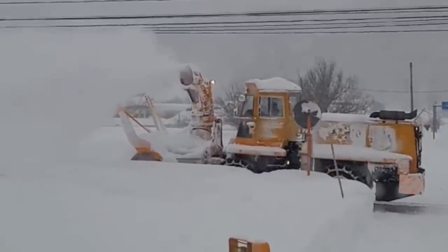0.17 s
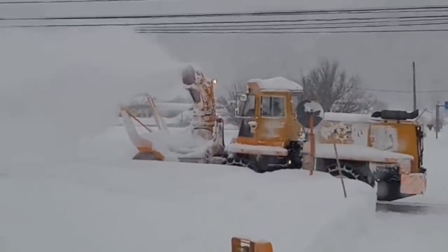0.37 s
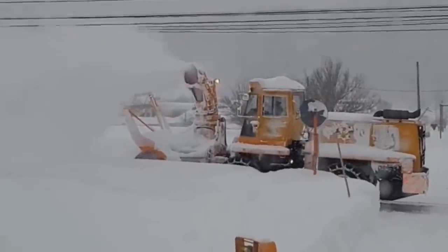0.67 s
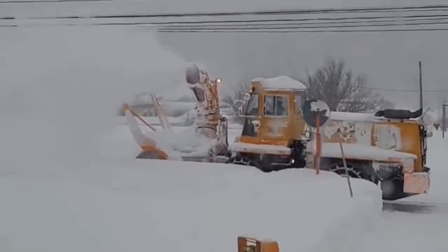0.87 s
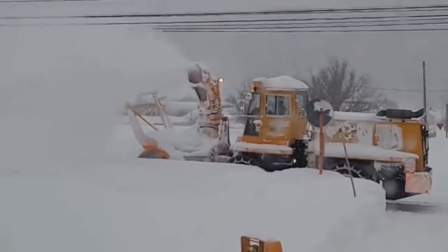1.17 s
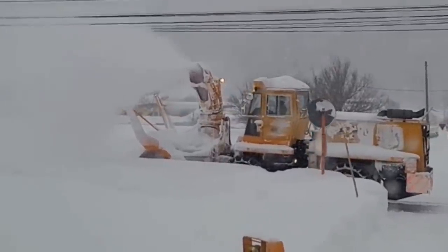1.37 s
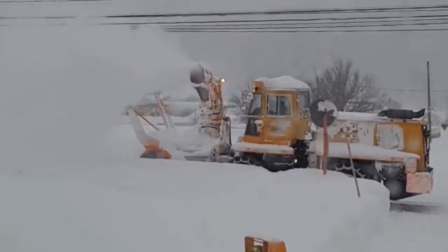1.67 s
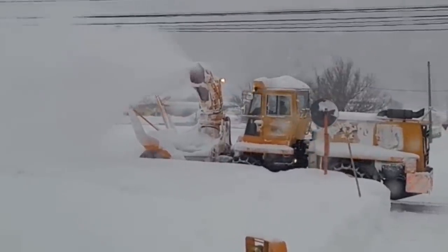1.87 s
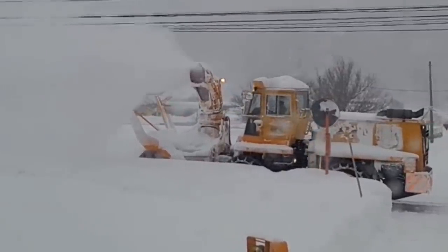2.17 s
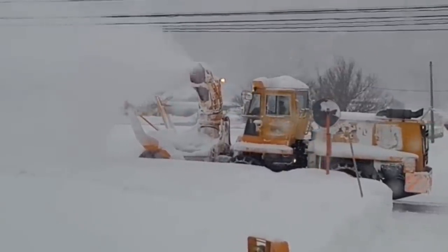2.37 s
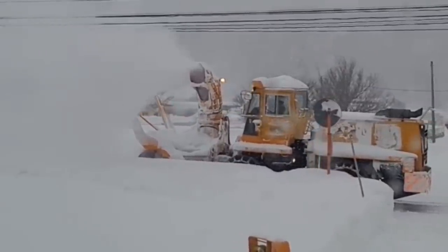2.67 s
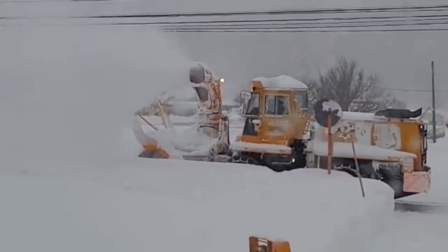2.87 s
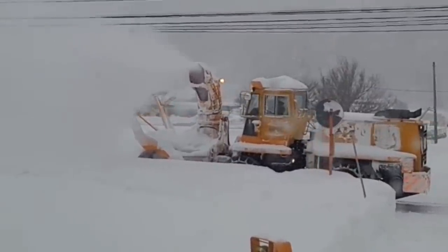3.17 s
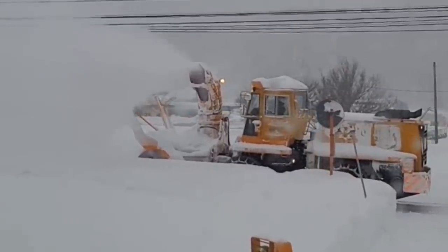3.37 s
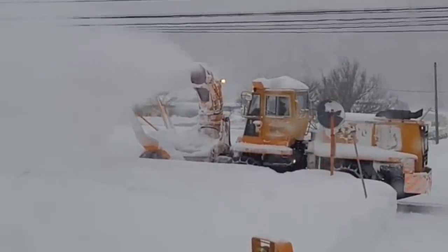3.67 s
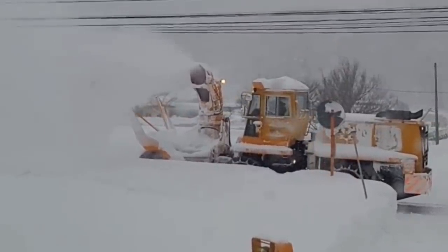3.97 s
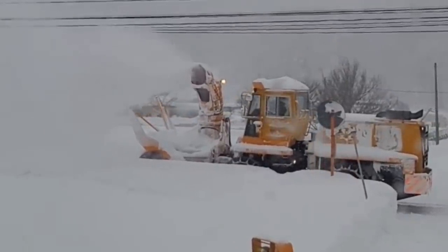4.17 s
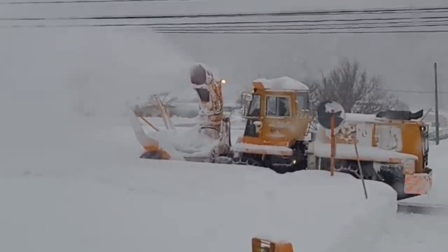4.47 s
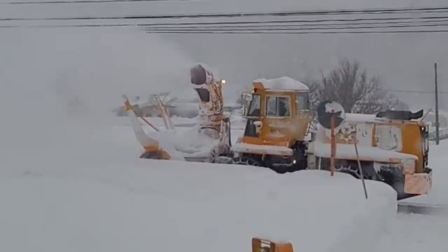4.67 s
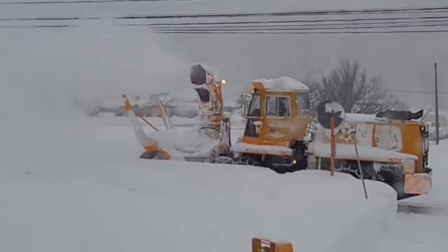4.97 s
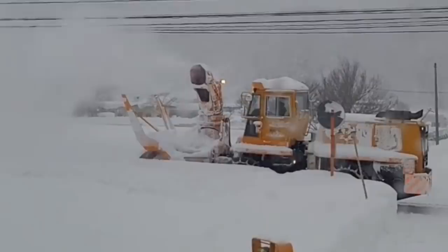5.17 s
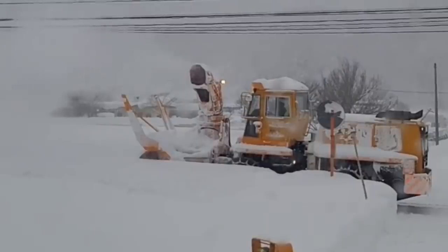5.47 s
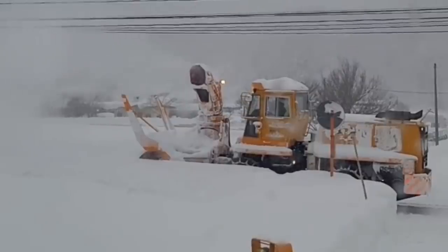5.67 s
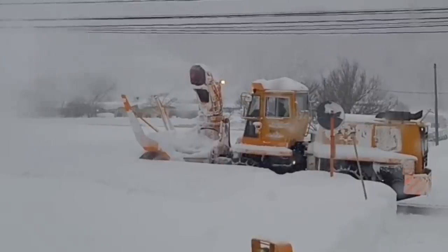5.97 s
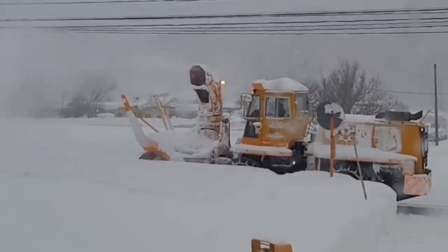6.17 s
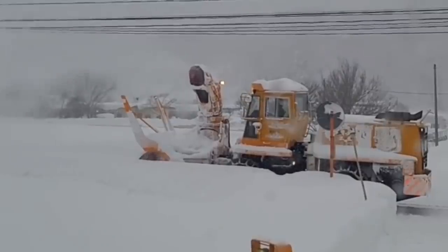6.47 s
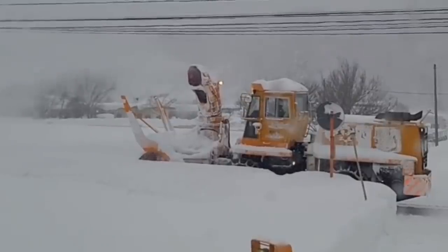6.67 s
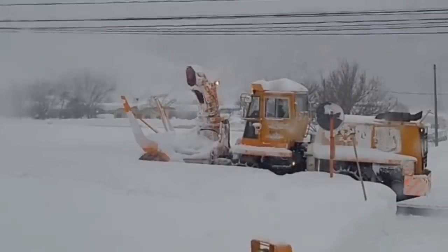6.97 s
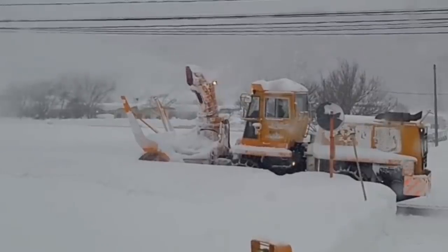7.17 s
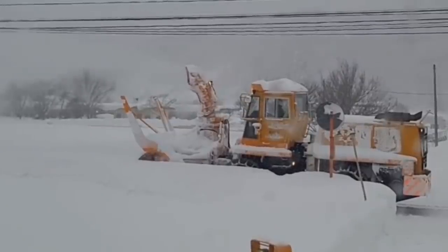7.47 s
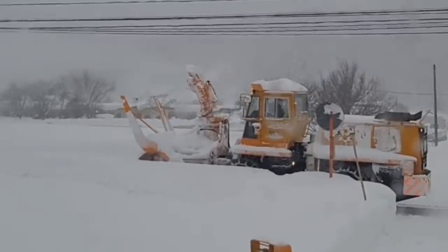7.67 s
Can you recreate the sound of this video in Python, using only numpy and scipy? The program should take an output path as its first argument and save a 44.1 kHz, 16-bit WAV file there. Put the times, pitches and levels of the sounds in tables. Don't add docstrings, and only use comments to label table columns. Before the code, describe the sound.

Inside an idling car, a heavy snow-clearing machine outside drones low and steady while the indicator relay ticks and tocks evenly on the dashboard.

```python
import sys
import numpy as np
from scipy import signal
from scipy.fft import rfft, irfft, next_fast_len
from scipy.io import wavfile
from scipy.ndimage import uniform_filter1d, map_coordinates

SR = 44100
rng = np.random.default_rng(int(sys.argv[2]) if len(sys.argv) > 2 else 0)


def put_to_file(sound):
    columns = np.atleast_2d(sound).T
    safe = np.clip(columns, -1, 1)
    whole_steps = np.round(safe * 32767)
    wavfile.write(sys.argv[1], SR, whole_steps.astype(np.int16))


def convert_level_to_amplitude(level_db):
    exponent = np.asarray(level_db, float) / 20
    return 10 ** exponent


N = 345303


def unit(x):
    return x / np.sqrt(np.mean(x ** 2) + 1e-20)


def along(points, hz):
    f, *cols = np.transpose(points)
    return [np.interp(np.log(hz + 1), np.log(f + 1), c) for c in cols]


def wobble(rate_hz):
    knots = rng.standard_normal(int(N * rate_hz / SR) + 4)
    return map_coordinates(knots, [np.arange(N) * rate_hz / SR])


def tone(radians, db, pan_db, lead_rad):
    left = convert_level_to_amplitude(pan_db / 2) * np.exp(.5j * lead_rad)
    right = convert_level_to_amplitude(-pan_db / 2) * np.exp(-.5j * lead_rad)
    ports = np.array([left, right])
    wave = np.sqrt(2) * convert_level_to_amplitude(db) * np.exp(1j * radians) / abs(ports.mean())
    return np.real(ports[:, None] * wave)


def rush(spectrum, gate, patchy_db):
    # frequency in Hz, likeness of the ports 0-1, left lead in radians, left-right in dB.
    port_points = [(30, .9, .2, -2), (55, .75, 0, -1), (140, .98, 0, -.5), (165, .9, .1, 2),
                   (185, .55, -1.1, -4), (215, .6, -.3, -8.5), (270, .93, -.3, -2.5), (350, .92, -.4, .4),
                   (410, .45, -1.6, -.5), (480, .6, -1, -6), (700, .3, -2, -3.5), (1030, .5, -2.9, -3),
                   (1500, .3, -3, -6.5), (2300, .15, -4, 1), (4000, .15, -6, -3), (5400, .3, -7, .5),
                   (7000, .1, -9, -5), (8200, .15, -9, 1), (12000, .2, -9, -2)]
    z = signal.stft(rng.standard_normal((2, N)) * gate, nperseg=512)[2]
    field = uniform_filter1d(rng.standard_normal(z.shape[1:]), 6, 0)
    field = uniform_filter1d(field, 14, 1)
    pair = signal.istft(z * convert_level_to_amplitude(patchy_db * unit(field)), nperseg=512)[1][:, :N]

    m = next_fast_len(N + 8192)
    hz = np.fft.rfftfreq(m, 1 / SR)
    in_band = (hz >= spectrum[0][0]) * (hz < spectrum[-1][0])
    modes_db = 1.5 * np.interp(hz, 27 * np.arange(900), rng.standard_normal(900)) * (hz > 500) * (hz < 5600)
    a, b = rfft(pair, m) * convert_level_to_amplitude(along(spectrum, hz)[0]) * in_band * convert_level_to_amplitude(modes_db)

    alike, lead_rad, pan_db = along(port_points, hz)
    mix_rad = np.arccos(np.clip(alike, 0, 1)) / 2
    common, differing = np.cos(mix_rad) * a, np.sin(mix_rad) * b
    left = (common + differing) * convert_level_to_amplitude(pan_db / 2) * np.exp(.5j * lead_rad)
    right = (common - differing) * convert_level_to_amplitude(-pan_db / 2) * np.exp(-.5j * lead_rad)
    return unit(irfft(np.array([left, right]), m)[:, :N])


def turns():
    # time in seconds, crank speed in Hz, car shake in Hz.
    speeds = [
        (0, 13.752, 35.565),
        (1, 13.754, 35.565),
        (2, 13.761, 35.565),
        (4.4, 13.761, 35.705),
        (5.9, 13.761, 35.7),
        (6.4, 13.748, 35.69),
        (7.83, 13.752, 35.62),
    ]
    start_turns = (-.0573, -.025, -.455)
    s, *cols = np.transpose(speeds)
    crank_hz, shake_hz = [np.interp(np.arange(N) / SR, s, c) for c in cols]
    hum_hz = 2.9198 * shake_hz
    return [np.cumsum(f) / SR + start for f, start in zip((crank_hz, shake_hz, hum_hz), start_turns)]


def engine_lines(crank):
    # order, level in dB rms, left-right in dB,
    # left lead in radians.
    order_lines = [(2.0, -58, -3, 0.4), (2.5, -53, -3, 0.4), (3.0, -29, -2, 0.3), (4.5, -57, -1, 0.4),
                   (6.0, -46, -1, 0.3), (7.0, -50, 0, -0.1), (8.5, -58, -2, 0.2), (9.0, -48, -3, 0.2),
                   (11.0, -49, 0, 0.0), (12.0, -44, -3, 1.1), (13.0, -64, -1, -0.5), (24.0, -47, -1, -0.3),
                   (29.0, -69, -5, -2.5), (30.0, -68, -4, -0.9), (32.0, -63, 2, -1.0),
                   (33.0, -64, -9, -0.6), (34.5, -67, -2, -1.1), (36.0, -59, -6, -1.3),
                   (44.0, -73, 0, -0.3), (46.5, -71, -2, -0.1), (48.0, -58, -1, 0.5), (60.0, -68, -1, -0.9),
                   (78.0, -79, -5, -2.7), (84.0, -64, -9, -0.7), (87.0, -66, -10, 2.6),
                   (96.0, -59, -9, -0.6),
                   (99, -73, 1, -1.8), (105, -74, -2, -.5), (108, -69, -11, 1.4), (117, -72, -5, 1.1),
                 (120, -68, -15, -1.4), (141, -74, -14, -2.7), (144, -75, -1, -1.5), (156, -82, -4, 0)]
    twist_rad = .008 * wobble(3) + .003 * wobble(14)
    out = 0
    for order, db, pan_db, lead_rad in order_lines:
        offset = rng.uniform(0, 2 * np.pi) * (order != 3)
        sway_db = 0.12 * np.log(order) * wobble(2.575)
        radians = order * (2 * np.pi * crank + twist_rad) + offset
        out = out + tone(radians, db + 0.035 * order + sway_db, pan_db, lead_rad)
    return out


def engine_noise(crank):
    # frequency in Hz, density in dB per Hz.
    boom_spectrum = [(18, -83), (37, -70), (47, -74.5), (66, -78.5), (94, -67), (112, -79.5), (147, -64.5),
                     (158, -63.5), (167, -66), (175, -81), (194, -81.5), (207, -75), (249, -72), (283, -78),
                     (339, -73.5), (420, -83.5)]
    body_spectrum = [(420, -84), (502, -84.5), (540, -89.5), (616, -91.5), (660, -86.5), (698, -90.5),
                     (834, -87.5), (1088, -92.5), (1233, -85.5), (1392, -94), (1603, -86.5), (1744, -92.5),
                     (1969, -95), (2100, -102.1)]
    rattle_spectrum = [(2100, -101), (2300, -99.5), (2800, -100), (2950, -105), (3220, -100), (3700, -105),
                       (4150, -101), (4300, -109), (4500, -114), (4670, -110), (4900, -113), (5150, -109),
                       (5950, -120), (7120, -119), (9000, -132), (11340, -130), (13200, -136)]
    panel_spectrum = [(320, -18), (327, 4), (334, 0), (341, -9)]
    cylinders_db = [-1.5, 0, -3, -4, -9.5, -8]
    load_db = 0.23 * wobble(0.91)
    pump = 1 + 0.11 * np.cos(2 * np.pi * 12 * crank) + 0.022 * np.cos(2 * np.pi * 24 * crank)
    firing = 3 * crank
    strength_db = np.array(cylinders_db)[np.floor(firing).astype(int) % 6]
    knock = convert_level_to_amplitude(strength_db) * np.exp(-2.5 * (firing % 1))

    boom_db = -36.5 + 0.2 * wobble(2.7) + 0.69 * wobble(6.6)
    boom = convert_level_to_amplitude(boom_db) * rush(boom_spectrum, 1, patchy_db=1.0)
    body = convert_level_to_amplitude(-44.5 + load_db) * rush(body_spectrum, pump * (1 + 0.2 * knock), patchy_db=1.35)
    rattle_db = -56.5 + load_db + 0.5 * wobble(12)
    rattle = convert_level_to_amplitude(rattle_db) * rush(rattle_spectrum, 1 + 0.098 * knock, patchy_db=1.0)
    panel = convert_level_to_amplitude(-54 + load_db) * rush(panel_spectrum, 1, patchy_db=-0.9)
    return boom + body + rattle + panel


def car(shake, hum):
    # left-right in dB, left lead in radians.
    hum_ports = (-3.8, .33)
    shaking = tone(2 * np.pi * shake, -41 + 0.61 * wobble(1.9), -2.2, .3)
    humming = tone(2 * np.pi * hum, -38 + 0.35 * wobble(1.9), *hum_ports)
    return shaking + humming


def whines():
    # frequency in Hz, width in Hz, level in dB rms, left-right in dB, left lead in radians.
    whine_lines = [(1541, 6, -56, -10, -2.1), (178.3, 1.5, -62, 1, -.6), (233.6, .6, -58, -5, -.3),
                   (258.5, .4, -57, -2, -.3)]
    out = 0
    for hz, width_hz, db, pan_db, lead_rad in whine_lines:
        pitch_hz = hz + width_hz * .4 * (wobble(2.2) + 0.62 * wobble(15))
        out = out + tone(2 * np.pi * np.cumsum(pitch_hz) / SR, db + 1.3 * wobble(9), pan_db, lead_rad)
    return out


def relay():
    # time in seconds, peak level of the housing in dB.
    relay_clicks = [(0.0176, -44.5), (0.4185, -44.5), (0.7485, -46), (1.1455, -44.5), (1.481, -48),
                    (1.89, -45.5), (2.2207, -45), (2.6216, -43), (2.9552, -47), (3.3493, -45),
                    (3.6843, -46), (4.078, -44.5), (4.4084, -44), (4.8075, -43), (5.1395, -47),
                    (5.5403, -45.5), (5.8723, -46), (6.2822, -45.5), (6.6143, -45.5), (7.015, -45.5),
                    (7.3452, -45.5), (7.756, -46)]
    # frequency in Hz, level in dB, t60 in seconds.
    tick_modes = [(2360, -7, 0.12), (2830, -8.5, 0.31), (3580, -7, 0.086), (4070, 2.5, .07),
                  (3750, -4.5, 0.1), (5040, -11.5, 0.089), (5630, -18.5, 0.048), (6100, -22.5, 0.051),
                  (6820, -20, 0.1), (7450, -21.5, 0.056), (8000, -24, 0.072), (8800, -22.5, 0.07),
                  (9700, -31, 0.071), (10500, -29.5, .06), (11300, -27, .06), (12200, -35.5, .05)]
    tock_modes = [(2214, -4.5, 0.19), (2750, -3, .09), (3384, -0.5, 0.13), (4184, 2, 0.057),
                  (5070, -14, 0.03), (6600, -28.5, .05), (7400, -32, .05), (8500, -25, 0.054),
                  (11500, -38.5, .05)]
    # closing in dB, opening in dB.
    contact_db = (-42.5, -42)
    out, t = np.zeros((2, N + SR)), np.arange(SR // 8) / SR
    for k, (s, db) in enumerate(relay_clicks):
        hz, mode_db, t60 = np.transpose(tock_modes if k % 2 else tick_modes)[:, :, None, None]
        mode_db = mode_db + (contact_db[k % 2] - db) * (hz > 6000)
        port_db = mode_db + rng.normal(0, 0.65, (len(hz), 2, 1))
        size = convert_level_to_amplitude(port_db - 60 * t / t60) * (1 - np.exp(-t / .002)) ** 2
        jitter = rng.normal(0, .145, (len(hz), 2, len(t))) * np.sqrt(np.maximum(hz / 4500, 1))
        drift_rad = np.cumsum(uniform_filter1d(jitter, size=9), axis=2)
        start_rad = rng.uniform(0, 5.1, (len(hz), 2, 1))
        ring = np.sum(size * np.sin(2 * np.pi * hz * t + drift_rad + start_rad), axis=0)
        for lag_s, bounce_db in [(-.004, 0.93), (.005, -2.2)]:
            out[:, round((s + lag_s) * SR):][:, :len(t)] += convert_level_to_amplitude(db - 2.5 + bounce_db) * ring
    return out[:, :N] * convert_level_to_amplitude([[-.7], [.7]])


def trim_creaks():
    # time in seconds, peak level in dB, frequency in Hz.
    creak_events = [
        (6.304, -69, 9700),
        (6.36, -76.5, 10800),
    ]
    out, t = np.zeros((2, N + SR)), np.arange(SR // 8) / SR
    for s, db, hz in creak_events:
        grit = rng.standard_normal((2, len(t))) * convert_level_to_amplitude(db - 60 * t / .04)
        band = signal.butter(1, [hz * .95, hz * 1.05], "band", fs=SR)
        out[:, round(s * SR):][:, :len(t)] += 4 * signal.lfilter(*band, grit)
    return out[:, :N] * convert_level_to_amplitude([[-.7], [.7]])


def scene():
    crank, shake, hum = turns()
    machine = engine_lines(crank) + engine_noise(crank)
    return machine + car(shake, hum) + whines() + relay() + trim_creaks()


def band_limit(x):
    return signal.sosfilt(signal.butter(12, 13000, fs=SR, output="sos"), x)


def record(dry):
    hz, _, z = signal.stft(dry, SR, nperseg=2048)
    treble = hz[:, None] > 7800
    margin_db = np.where(treble, -9.5, -13)
    power = abs(z.mean(axis=0)) ** 2
    around = uniform_filter1d(power, size=70, axis=0)
    masked = uniform_filter1d(power, size=6, axis=0) < convert_level_to_amplitude(margin_db) * around
    masked = uniform_filter1d(masked * 1., size=5, axis=0) > .1
    near = uniform_filter1d(uniform_filter1d(power, size=90, axis=0), size=3, axis=1)
    starved = uniform_filter1d(power, size=16, axis=0) < convert_level_to_amplitude(-8.5) * near
    starved = (uniform_filter1d(starved * 1., size=9, axis=0) > .1) & treble
    dropped = (masked | starved) & (hz[:, None] > 2400)
    mix = signal.istft(z * np.where(dropped, convert_level_to_amplitude(-24), 1), SR, nperseg=2048)[1][:, :N]
    return band_limit(mix)


dry = scene()
out = record(dry)
put_to_file(out)
```